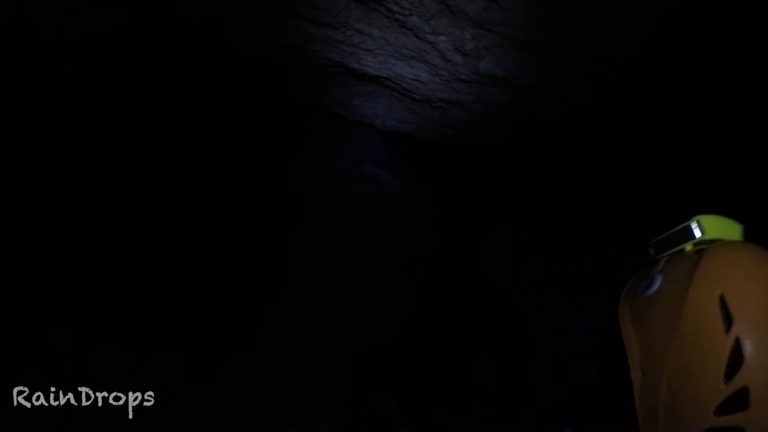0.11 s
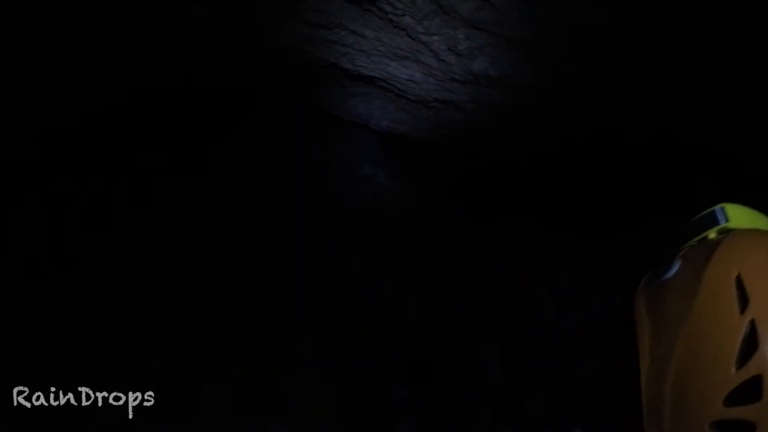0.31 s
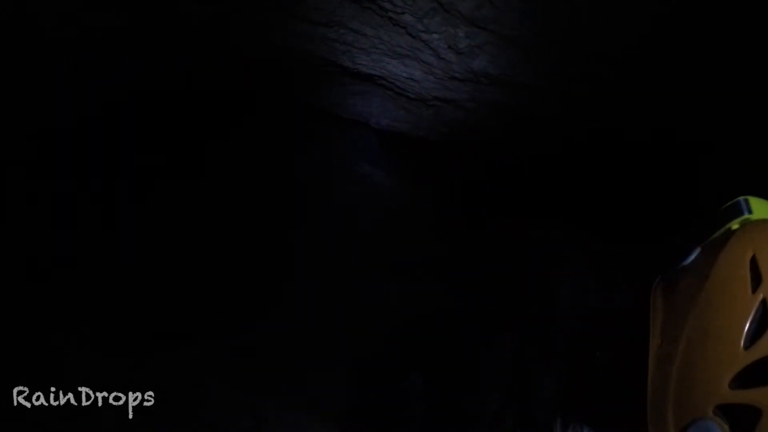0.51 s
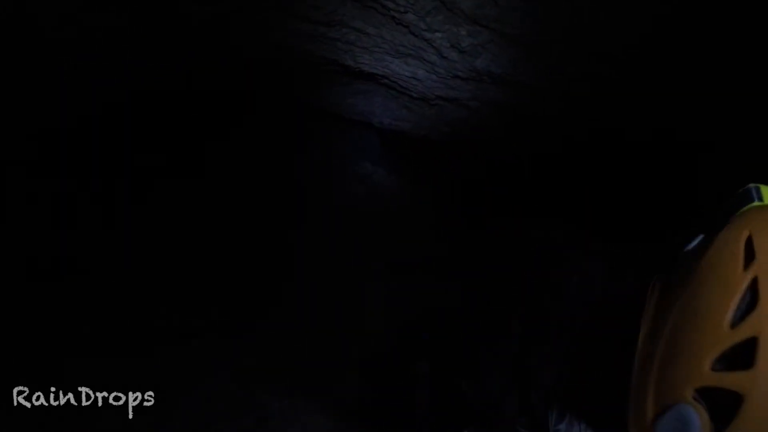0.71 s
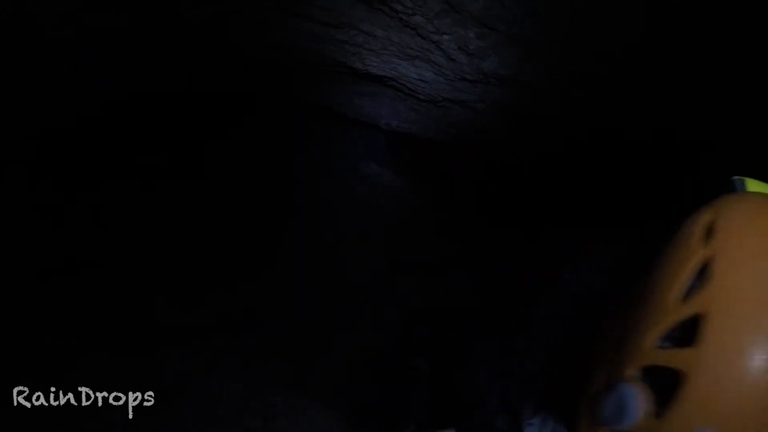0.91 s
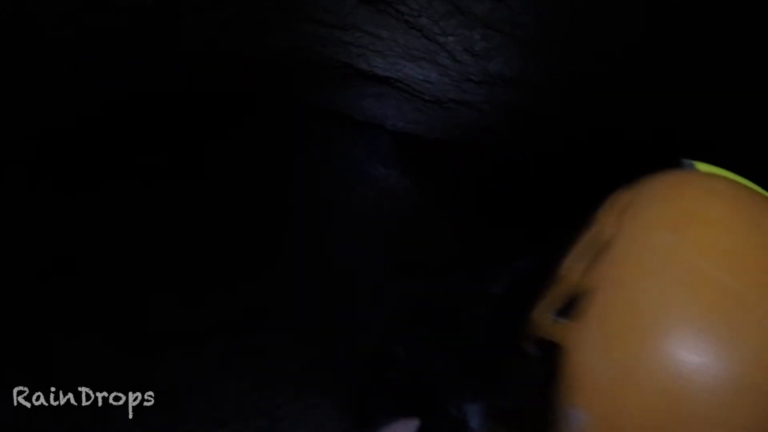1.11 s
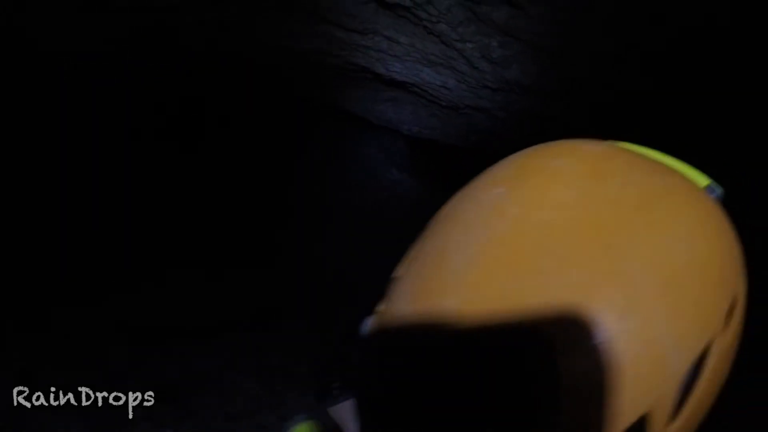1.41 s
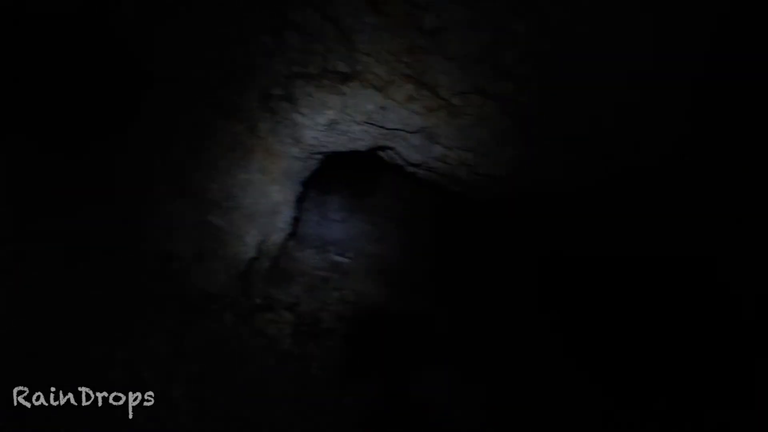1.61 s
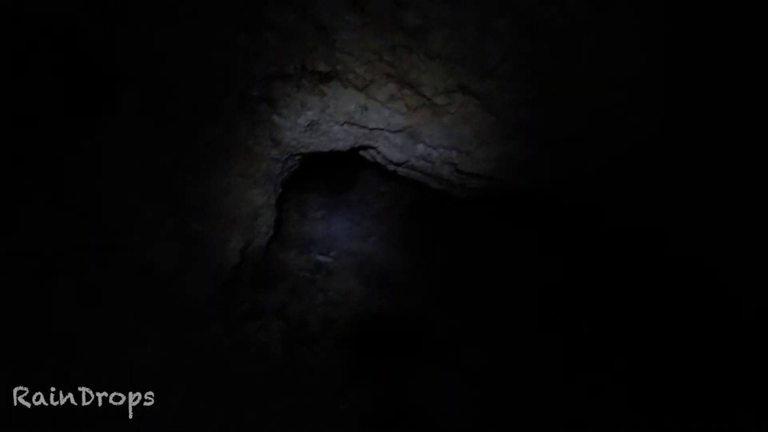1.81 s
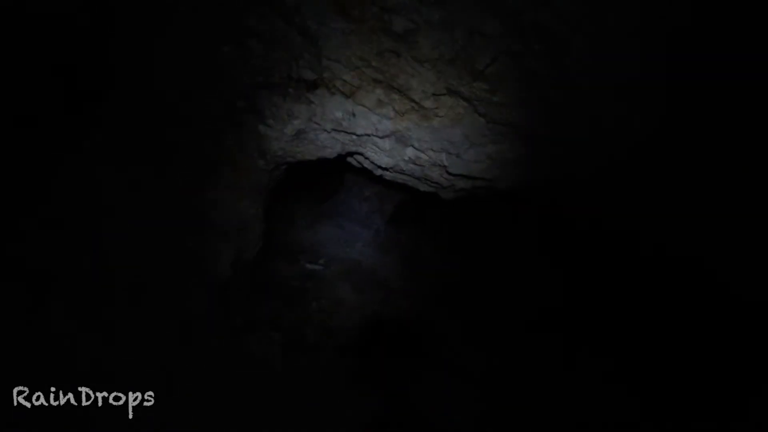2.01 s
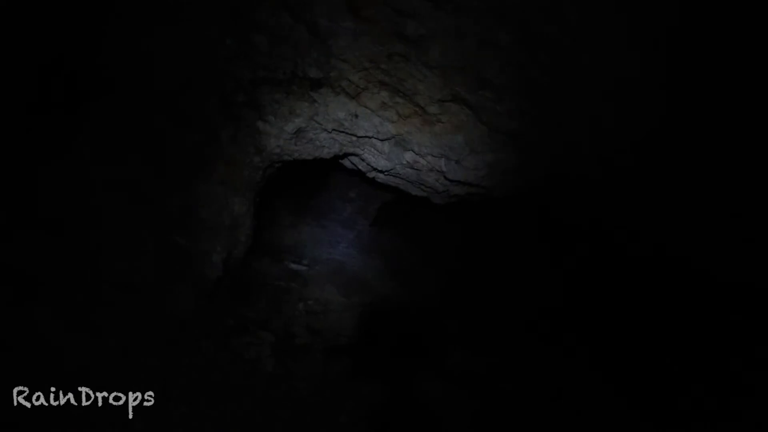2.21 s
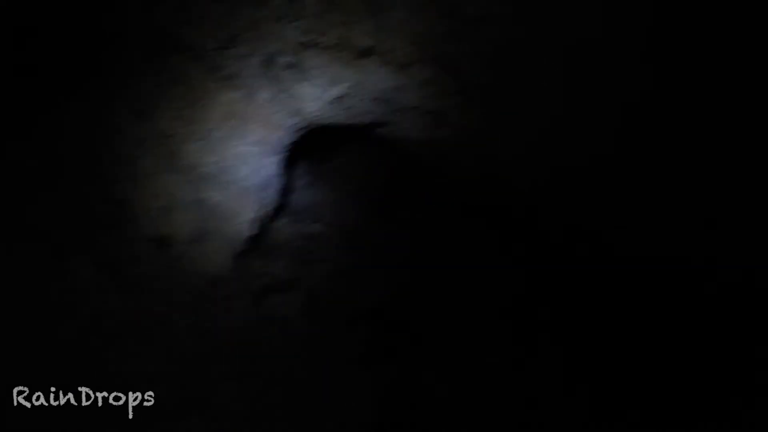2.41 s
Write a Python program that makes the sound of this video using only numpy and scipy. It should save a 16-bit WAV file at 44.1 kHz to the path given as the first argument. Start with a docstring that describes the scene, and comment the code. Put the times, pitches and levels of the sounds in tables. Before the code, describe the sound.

Two footsteps on loose stones in a tight rock tunnel, close and slightly right. From 0.1 to 0.8 s a boot grinds grit in jerks, with hard knocks near 0.46 and 0.63. A lull holds faint rustling around 1.1 and a soft rubble shift near 1.25. From 1.5 to 1.95 the second step crunches, knocks and clinks; small ticks fade by 2.3 over quiet rumble and hiss.

```python
"""Two steps in a rock tunnel

In a narrow tunnel, two steps on loose rock close to a stereo pair, a little stronger on the right.
Boots grind grit in jerks (clumped clicks and chips); stones knock, drag and clink (short struck modes).
Rubble and ground take the weight as dull crunches and thumps; fine crackle rustles and scratches.
The walls answer briefly (decaying noise), over a quiet rumble and hiss (coloured noise)."""
import sys
import numpy as np
from scipy import signal
from scipy.fft import rfft, irfft
from scipy.io import wavfile

SR = 44100
rng = np.random.default_rng(int(sys.argv[2]) if len(sys.argv) > 2 else 0)


def generate_wav(signal):
    """Clip the signal to [-1, 1] and save it as 16-bit WAV at the path in sys.argv[1]."""
    frames = np.transpose(np.atleast_2d(signal))
    scaled = np.clip(frames, -1, 1) * 32767
    pcm = np.round(scaled).astype(np.int16)
    wavfile.write(sys.argv[1], SR, pcm)


N = 114660
TIME = np.arange(N) / SR  # seconds

# spectrum of the still air in the tunnel: (frequency [Hz], density [dB per Hz])
AIR_COLOUR = [(25, 3), (300, -2.5), (750, -11), (1900, -14.5), (2600, -19), (3350, -8.5), (4300, -14.5),
              (5500, -25), (6700, -28), (8000, -63.5)]
# left-right likeness of the air and of the close sounds: (frequency [Hz], likeness [0-1])
AIR_LIKENESS = [(30, 0), (120, 0.8), (1000, 0.89), (3000, 0.7), (8000, 0.2)]
NEAR_LIKENESS = [(300, 1), (2000, 0.96), (7000, 0.61)]
# spectrum of the wall reflections: (frequency [Hz], density [dB per Hz])
WALL_CUT_HZ = 990
WALL_COLOUR = [(200, 1), (WALL_CUT_HZ, -5), (8000, -18)]
# strength of the rustling and scratching: (time [s], level [dB])
RUSTLE_SCRATCH_LEVEL = [(0, -70.5), (.85, -71.5), (1.08, -62), (1.24, -72.5), (1.53, -79), (1.555, -61),
                        (1.8, -73.5), (2.15, -75.5), (2.6, -80)]
# spectrum of the rustling and scratching: (frequency [Hz], density [dB per Hz])
RUSTLE_SCRATCH_COLOUR = [(120, -9), (500, 1), (4200, -7), (8000, -15)]
# spectrum of crushed dust: (frequency [Hz], density [dB per Hz])
DUST_COLOUR = [(300, -17.0), (2500, 5), (6300, -4.5), (8000, -5)]
# single bits of grit snap: (time [s], level [dB], pitch [Hz])
SNAPS = [(0.089, -40, 2800), (0.108, -39, 2600), (0.462, -29, 6080), (0.6739, -38.5, 5600),
         (1.122, -42.5, 2190), (1.548, -36, 3070), (1.657, -31.5, 3770), (1.872, -35.5, 3650),
         (1.908, -26, 4430), (2.018, -41, 3660), (2.175, -40, 3850)]
# touches of a hard flat stone: (time [s], level [dB])
CLINKS = [(1.892, -30.5), (1.935, -41.5), (1.939, -30)]
# modes of the flat stone: (frequency [Hz], relative level [dB], t60 [s])
CLINK_MODES = [(1160, -7.5, 0.023), (2314, 3, 0.019), (2464, -4.5, 0.019), (2710, -7, 0.031),
               (4400, -19, 0.032), (7500, -11, 0.0072)]
# stones drag and chatter, big ones low: (time [s], level [dB], pitch [Hz], decay [s])
DRAGS = [(0.649, -46.5, 1280, 0.0084), (.761, -53.5, 434, .025), (.808, -50.5, 1230, 0.01),
         (1.293, -50.5, 457, 0.03), (1.609, -44.5, 1420, 0.013), (1.634, -37.5, 1400, 0.0096),
         (1.684, -43.5, 1530, 0.023), (1.956, -55.5, 198, 0.045)]
# stones click or knock with no added thud: (time [s], ring level [dB], pitch [Hz])
PLAIN_KNOCKS = [(.301, -39, 950), (.6275, -37, 658), (1.634, -47, 1355), (1.732, -31, 1900),
                (1.813, -37.5, 600), (2.059, -56.5, 1030), (2.199, -46.5, 1330), (2.269, -53.5, 597),
                (2.319, -49, 900)]
# modes of any struck stone: (multiple of its pitch [ratio], relative level [dB], t60 [cycles])
STONE_MODES = [(0.681, -2, 9.5), (1.001, 5.5, 11), (1.448, -5, 16.6)]
# stone knocks: (time [s], ring level [dB], pitch [Hz], thud level [dB], crack level [dB])
KNOCKS = [(.169, -46.5, 910, -49.5, -72), (0.208, -67, 716, -41.5, -47), (0.457, -28.5, 1610, -50, -49),
          (0.4624, -21, 1313, -48, -75), (.468, -27, 1030, -40, -77), (.484, -31, 1420, -34, -83),
          (0.532, -43.5, 770, -37.5, -64), (0.541, -39, 990, -45, -64), (0.6231, -30.5, 1280, -35, -49),
          (0.785, -42.5, 2180, -40, -61.5), (0.807, -43, 1490, -33, -65), (1.0078, -46.5, 874, -44, -60.5),
          (1.493, -50, 1020, -46, -54), (1.7119, -24.5, 1570, -35, -57), (1.738, -29.5, 1190, -44, -58),
          (1.774, -20, 2460, -53, -60), (1.829, -43, 605, -34.5, -67), (1.902, -35, 1017, -35, -55),
          (1.909, -36, 1230, -43, -63), (2.128, -52, 1740, -66, -56.5)]
# spectrum of the cracks: (frequency [Hz], density [dB per Hz])
CRACK_COLOUR = [(100, 1), (500, -3.5), (3200, -6.5), (6300, -12), (8000, -26.5)]
# deep thumps of the weight on the ground: (time [s], level [dB])
THUMPS = [(.22, -59), (.43, -57), (1.485, -57.5), (1.813, -53.5), (2.114, -60)]
# spectrum of the thumps: (frequency [Hz], density [dB per Hz])
THUMP_COLOUR = [(25, -17), (70, 7), (150, -7.5), (700, -63)]
# rubble shifts with a dull crunch: (time [s], level [dB], attack [s], decay [s])
TREADS = [(.25, -61, 0.014, 0.037), (.46, -51.5, 0.014, 0.037), (.531, -42.5, 0.0037, 0.0091),
          (0.777, -45, 0.0013, 0.014), (1.253, -54.5, 0.016, 0.13), (1.486, -51.5, 0.0018, 0.025),
          (1.539, -52, 0.0023, 0.017), (1.806, -46, 0.0038, 0.063)]
# spectrum of the crunches: (frequency [Hz], density [dB per Hz])
TREAD_COLOUR = [(50, -14.5), (185, 1.5), (290, -5), (460, -3), (750, -14), (1300, -14.5), (3000, -24),
                (8000, -59.5)]
# pressure of the sole on the grit in each step: (time [s], level [dB])
STEP_ONE = [(0, -65), (.05, -64), (.1, -54.5), (.163, -67), (.18, -55), (.245, -51), (.27, -46.5),
            (.295, -52), (.346, -55), (.354, -50), (.385, -49.5), (.425, -46), (.49, -47), (.525, -56.5),
            (.555, -53.5), (.6, -68.5), (.645, -59), (.665, -54.5), (.74, -71.5)]
STEP_TWO = [(1.53, -62.5), (1.6, -58.5), (1.635, -51.5), (1.658, -43.5), (1.68, -46.5), (1.688, -43.5),
            (1.74, -44), (1.81, -48.5), (1.865, -58.5), (1.9, -46), (1.96, -60.5), (2.22, -75)]
# spectrum of the grit under each step: (frequency [Hz], density [dB per Hz])
GRIT_ONE = [(40, -45.5), (80, -1), (210, 2), (550, -1.5), (760, -6.5), (1000, -4.5), (2000, -9.5),
            (3800, -25.5), (6000, -26), (8000, -39)]
GRIT_TWO = [(50, -18), (110, -2.5), (190, 2.5), (280, -1), (480, 1.5), (780, -7), (1480, -4.5),
            (2200, -9.5), (4000, -16.5), (6500, -23), (8000, -43)]

AIR_DB, TUNNEL_DB, TUNNEL_T60_S = -67, -15.5, 0.1
LEFT_DB, RIGHT_DB, LEFT_LAG_S = -1.1, 1.0, .000035
CUTOFF_HZ = 8300
CONTACT_S = 0.00089  # rise time of a stone contact
SNAP_CYCLES = 18  # t60 of a snap in cycles
DRAG_WIDTH_OCTAVES = 0.39
THUD_HZ, THUD_SPREAD = 412, .04  # middle pitch, and its random spread as a share
THUD_T60_S, THUD_ATTACK_S, CRACK_DECAY_S = 0.03, 0.0012, 0.0094
CHIP_GAP_S, CHIP_HZ = .009, (600, 2600)
CHIP_DB, CHIP_RANGE_DB = 4, 6  # weakest chip against the sole's pressure, and the range above it
SLIP_GAP_S, SLIP_DECAY_S = (.007, .022), .006


def from_db(db):
    """Decibels to gain."""
    return 10 ** (np.asarray(db) / 20)


def rms_one(x):
    """Scale to rms 1."""
    return x / np.sqrt(np.mean(x ** 2) + 1e-20)


def level(rows):
    """Gain along a (time [s], level [dB]) curve, practically silent outside it."""
    s, db = np.transpose(rows)
    return from_db(np.interp(TIME, s, db, left=-120, right=-120))


def at_hz(points, hz):
    """Read a table on a log-frequency axis."""
    f, v = np.transpose(points)
    return np.interp(np.log(hz + 1), np.log(f), v)


def coloured(pair, colour, likeness):
    """Two unrelated signals become a stereo sound of given colour and likeness; rms 1."""
    hz = np.arange(N // 2 + 1) * SR / N
    bass_loss = hz / (hz + 10)
    mid, side = rfft(pair) * from_db(at_hz(colour, hz)) * bass_loss
    alike = np.clip(at_hz(likeness, hz), -1, 1)
    # the side signal enters the two channels with opposite sign
    stereo = np.sqrt(1 + alike) * mid + np.sqrt(1 - alike) * side * [[1], [-1]]
    return rms_one(irfft(stereo * (hz < CUTOFF_HZ), N))


def noise(colour, likeness):
    """Steady random noise of a given colour."""
    return coloured(rng.standard_normal((2, N)), colour, likeness)


def fractures(per_s, spread_db):
    """Random clicks of uneven size, in two unrelated trains."""
    sizes = from_db(spread_db * np.minimum(rng.exponential(1, (2, N)), 3))
    signs = rng.choice([-1, 1], (2, N))
    return sizes * signs * (rng.random((2, N)) < per_s / SR)


def grains(colour, per_s, spread_db):
    """Fine broadband crackle made of many small fractures."""
    return coloured(fractures(per_s, spread_db), colour, NEAR_LIKENESS)


def burst(s, attack_s, decay_s):
    """Envelope that rises at s and dies away."""
    age = np.maximum(TIME - s, 0)
    return (1 - np.exp(-age / attack_s)) * np.exp(-np.minimum(age / decay_s, 50))


def ring(s, hz, t60, attack_s):
    """One mode, struck at s; a softer contact makes it rise more slowly."""
    return burst(s, attack_s, t60 / np.log(1000)) * np.sin(2 * np.pi * hz * (TIME - s))


def stone(s, db, hz):
    """The short ring of a struck stone: a few modes at multiples of its pitch."""
    out = 0
    for ratio, mode_db, cycles in STONE_MODES:
        mode_hz = hz * ratio
        out = out + from_db(db + mode_db) * ring(s, mode_hz, cycles / mode_hz, CONTACT_S)
    return out


def air():
    """Still air in the tunnel: steady coloured noise, stronger on the right."""
    return from_db(AIR_DB) * noise(AIR_COLOUR, AIR_LIKENESS) * from_db([[-2], [2]])


def tunnel(x):
    """Dense, dull reflections from the close rock walls, as a decaying noise response."""
    tail = noise(WALL_COLOUR, NEAR_LIKENESS)
    tail = tail * burst(0.0032, attack_s=0.0016, decay_s=TUNNEL_T60_S / np.log(1000))
    tail = tail / np.sqrt(np.sum(tail ** 2) * SR / (8 * WALL_CUT_HZ))
    return from_db(TUNNEL_DB) * signal.fftconvolve(x, tail, axes=1)[:, :N]


def rustle_and_scratch():
    """Fine crackle of rustling and scratching that swells and sinks."""
    return level(RUSTLE_SCRATCH_LEVEL) * grains(RUSTLE_SCRATCH_COLOUR, per_s=7000, spread_db=-2.5)


def dust(touches):
    """A pinch of dust is crushed at each sharp touch."""
    crush = sum(from_db(db - 16.0) * burst(s, CONTACT_S, decay_s=0.0044) for s, db, *_ in touches)
    return crush * grains(DUST_COLOUR, per_s=11000, spread_db=2)


def snaps():
    """Bits of grit snap: small bright ticks, each a short-lived mode."""
    return sum(from_db(db) * ring(s, hz, SNAP_CYCLES / hz, CONTACT_S) for s, db, hz in SNAPS)


def clinks():
    """The flat stone rings in all its modes at each touch."""
    out = 0
    for s, db in CLINKS:
        for hz, mode_db, t60 in CLINK_MODES:
            out = out + from_db(db + mode_db) * ring(s, hz, t60, CONTACT_S)
    return out


def drags():
    """Rapid slips excite one broad resonance of a dragged stone."""
    out, half = 0, 2 ** (DRAG_WIDTH_OCTAVES / 2)
    for s, db, hz, decay in DRAGS:
        resonance = signal.butter(2, [hz / half, hz * half], "band", fs=SR, output="sos")
        chatter = signal.sosfilt(resonance, fractures(per_s=2800, spread_db=4)[0])
        out = out + from_db(db) * burst(s, CONTACT_S, decay) * rms_one(chatter)
    return out


def plain_knocks():
    """Stones click or knock with a short ring of their own pitch and no added thud."""
    return sum(stone(s, db, hz) for s, db, hz in PLAIN_KNOCKS)


def knocks():
    """Each knock is a crack, a short ring of the stone and a thud of the rubble under it."""
    rings = thuds = cracks = 0
    for s, ring_db, hz, thud_db, crack_db in KNOCKS:
        rings = rings + stone(s, ring_db, hz)
        thud_hz = THUD_HZ * np.exp(THUD_SPREAD * rng.normal())
        thuds = thuds + from_db(thud_db + 2.5) * ring(s, thud_hz, THUD_T60_S, THUD_ATTACK_S)
        cracks = cracks + from_db(crack_db) * burst(s, attack_s=0.0002, decay_s=CRACK_DECAY_S)
    # the thud starts with the opposite sign to the ring
    return rings - thuds + cracks * grains(CRACK_COLOUR, per_s=9800, spread_db=2)


def thumps():
    """The ground takes the weight: short bursts of deep noise."""
    weight = sum(from_db(db) * burst(s, attack_s=0.0032, decay_s=0.027) for s, db in THUMPS)
    return weight * noise(THUMP_COLOUR, NEAR_LIKENESS)


def treads():
    """Rubble shifts under the weight: bursts of dull crackle."""
    weight = sum(from_db(db) * burst(s, attack, decay) for s, db, attack, decay in TREADS)
    return weight * grains(TREAD_COLOUR, per_s=1200, spread_db=-1.0)


def slips():
    """Each jerk of the sole is a sudden crunch that sinks back until the next; rms 1."""
    gaps = rng.uniform(*SLIP_GAP_S, int(N / SR / SLIP_GAP_S[0]))
    starts = np.cumsum(np.r_[0, gaps])
    age = TIME - starts[np.searchsorted(starts, TIME, side="right") - 1]
    return rms_one(.5 + np.exp(-age / SLIP_DECAY_S))


def chips(step):
    """Chips of stone break loose: sharp, nearly dead clicks at uneven gaps, each at its own pitch."""
    out, age = np.zeros(N), TIME[:SR // 100]
    low, high = CHIP_HZ
    for k, s in enumerate(np.arange(step[0][0], step[-1][0], CHIP_GAP_S)):
        late, pitch, size = rng.random(3)
        hz = low * (high / low) ** pitch
        start = int((s + late * CHIP_GAP_S) * SR)
        click = np.exp(-age * hz) * np.sin(2 * np.pi * hz * age)
        # the sign alternates from chip to chip
        out[start:start + len(age)] += (-1) ** k * from_db(CHIP_DB + CHIP_RANGE_DB * size) * click
    return out


def gravel(colour, per_s, spread_db, clump_db):
    """Each size of pebble sounds in its own band and clumps; small ones are more numerous."""
    edges, out = np.geomspace(40, 9000, 15), 0
    knots = np.arange(0, N / SR, .012)
    for low, high in zip(edges, edges[1:]):
        plenty = np.sqrt(high / 1000)  # per_s holds at 1 kHz
        clumps = from_db(clump_db * np.interp(TIME, knots, rng.uniform(-1, 1, len(knots))))
        band = signal.butter(2, [low, high], "band", fs=SR, output="sos")
        clicks = rms_one(fractures(per_s * plenty, spread_db))
        out = out + signal.sosfilt(band, clumps * clicks + 1e-18)
    return coloured(out, colour, NEAR_LIKENESS)


def scuffs():
    """The soles grind grit against the rock in jerks and break chips loose, as hard as they press."""
    grit_one = gravel(GRIT_ONE, per_s=1200, spread_db=3.5, clump_db=2.5) * slips()
    grit_two = gravel(GRIT_TWO, per_s=900, spread_db=3.0, clump_db=5.0) * slips()
    first = level(STEP_ONE) * (grit_one + chips(STEP_ONE))
    second = level(STEP_TWO) * (grit_two + chips(STEP_TWO))
    return first + second


def scene():
    """Steps, rustle and scratch close by, stronger and earlier on the right, over the still air."""
    stones = dust(SNAPS + CLINKS) + snaps() + clinks() + drags() + plain_knocks() + knocks()
    feet = stones + thumps() + treads() + scuffs()
    left, right = feet + tunnel(feet) + rustle_and_scratch()
    late_left = np.interp(TIME - LEFT_LAG_S, TIME, left)
    near = np.array([from_db(LEFT_DB) * late_left, from_db(RIGHT_DB) * right])
    return air() + near


def record(dry):
    """The microphone loses the highest treble, and the top is cut steeply."""
    soft = signal.sosfilt(signal.butter(8, 7400, fs=SR, output="sos"), dry)
    return signal.sosfilt(signal.ellip(10, .2, 70, CUTOFF_HZ, fs=SR, output="sos"), soft)


dry = scene()
out = record(dry)
generate_wav(out)
```